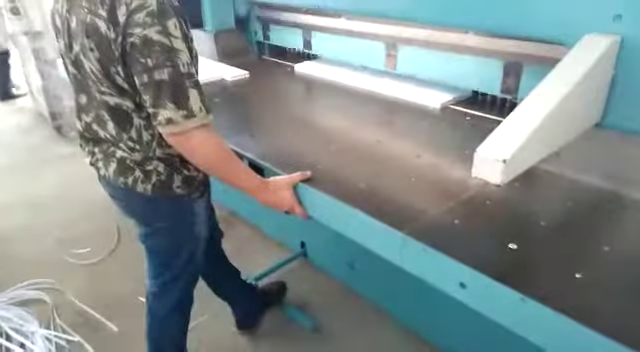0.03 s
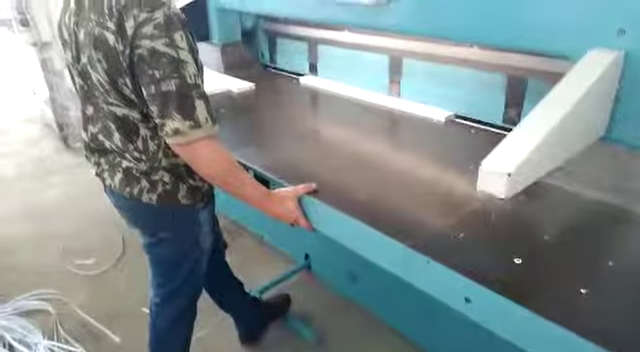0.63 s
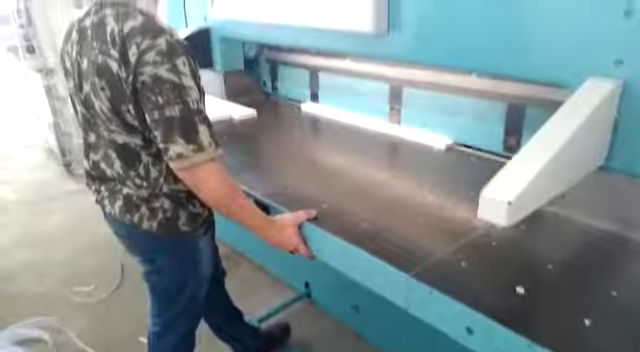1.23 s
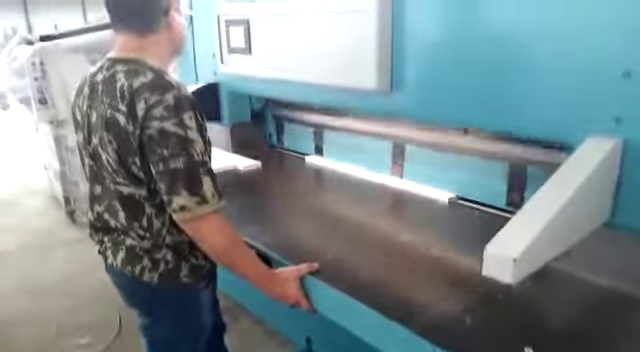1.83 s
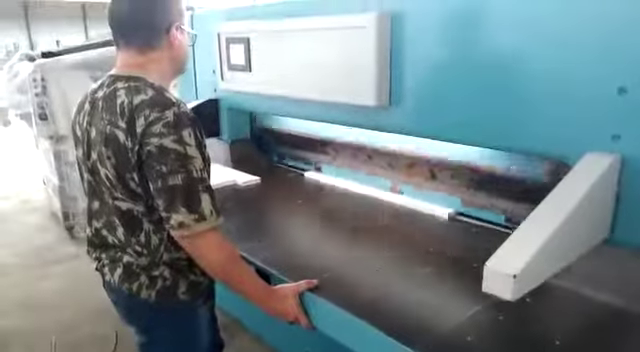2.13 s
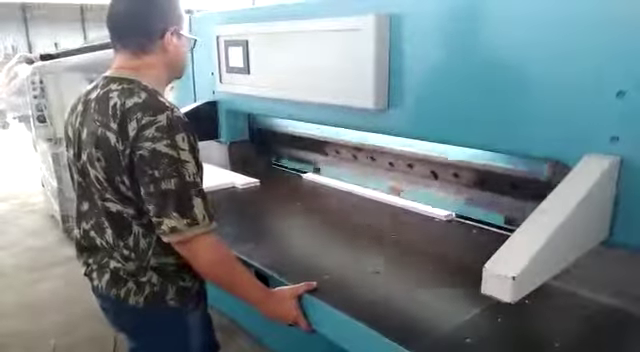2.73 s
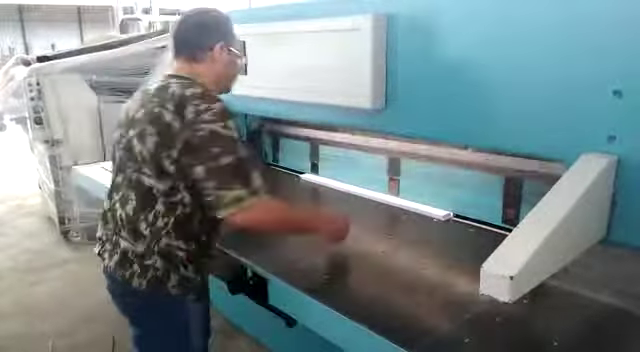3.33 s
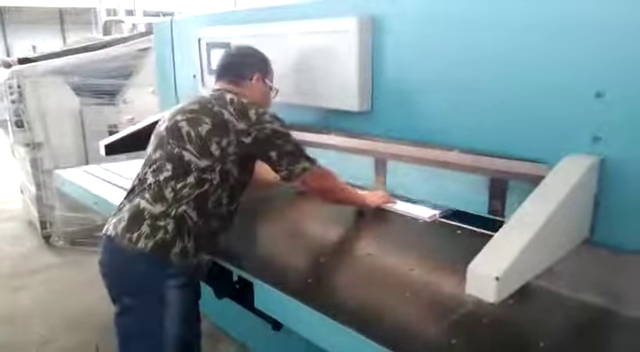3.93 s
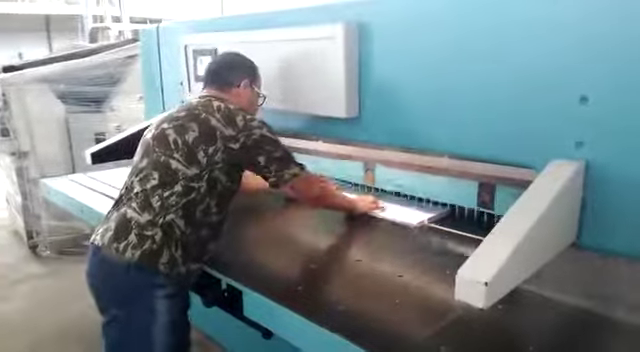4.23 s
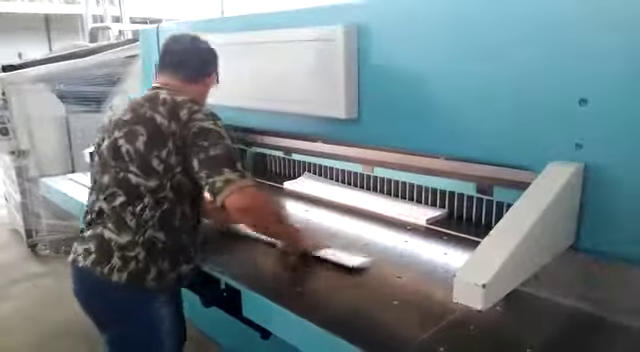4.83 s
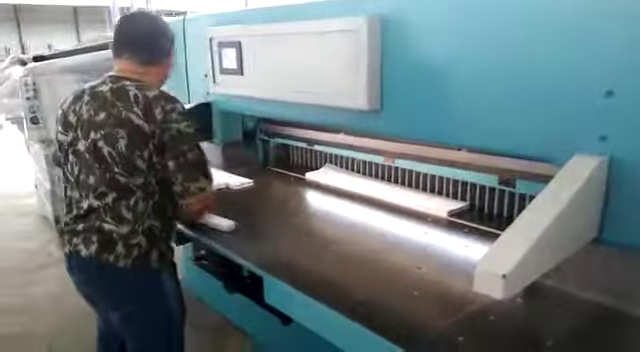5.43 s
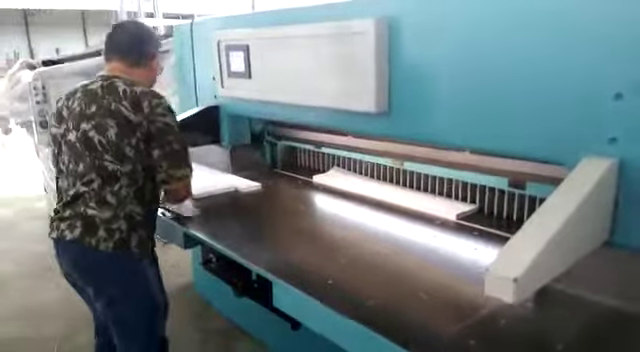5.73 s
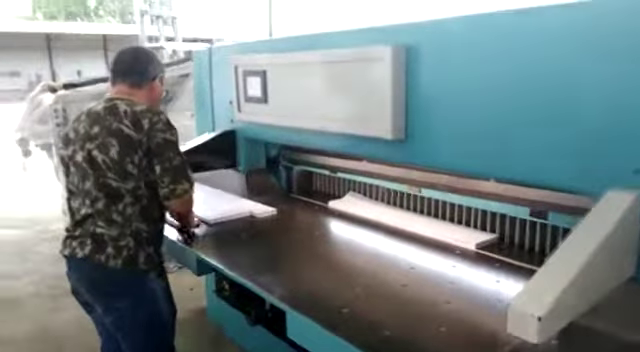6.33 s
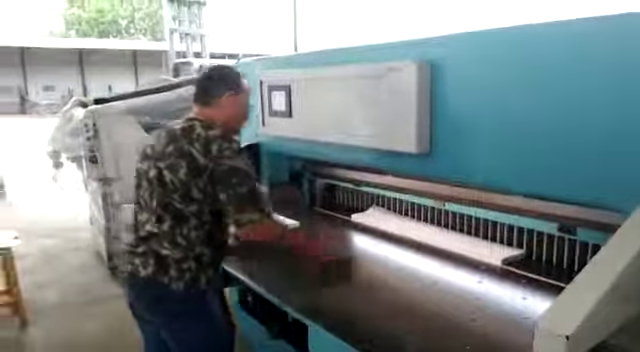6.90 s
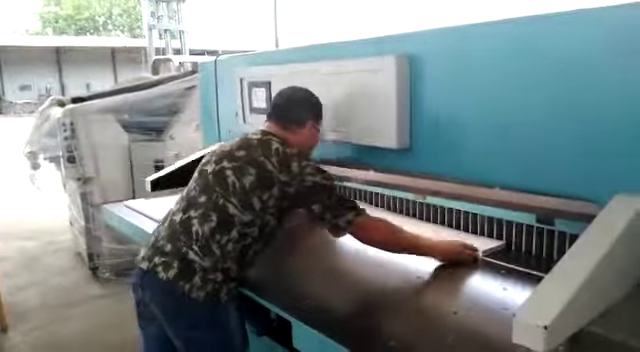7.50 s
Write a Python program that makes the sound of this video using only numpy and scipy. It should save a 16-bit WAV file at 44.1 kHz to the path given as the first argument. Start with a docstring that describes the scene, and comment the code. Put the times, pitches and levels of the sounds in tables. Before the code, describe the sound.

A large hydraulic paper cutter runs in a workshop, its blower droning and air hissing throughout. After a soft swish and light knocks, the clamp slams down at about 0.9 seconds and shudders briefly. From 1 second the pump hums under load, its tones swelling over an uneven gear rumble, with dull thumps near 1.7 seconds. The blade cuts the paper stack around 2.3 to 2.6 seconds with a faint swish and heavy thuds. Ringing steel clacks come at 2.8 seconds, a loud thump at 3.2, a small clink at 3.5 as the pump unloads, and more clacks until 3.8. The blows ring briefly in the room, and each thump ducks the phone microphone's level. After a lull around 4 seconds, the drone, hum and hiss swell back with a fuzzy, wavering whistle, the hiss growing stronger toward the end at about 7.7 seconds.

```python
"""A hydraulic paper guillotine makes one cut: the clamp slams down and shudders, the pump sings under
load while the blade thuds through the stack and returns, and steel parts clack.
Underneath, the blower drones and the air table hisses; the blows ring on in the workshop.
Heard through a phone's two microphone ports: each thump ducks the gain, and the drone swells back."""
import sys
import numpy as np
from scipy import signal
from scipy.fft import rfft, irfft
from scipy.io import wavfile
from scipy.ndimage import uniform_filter1d

SR = 44100
rng = np.random.default_rng(int(sys.argv[2]) if len(sys.argv) > 2 else 0)


def materialize(psi):
    """Save the field psi as 16-bit PCM at rate SR to the path in sys.argv[1].

    A 1-D psi becomes a single channel; in a 2-D psi each row is a channel.
    """
    bounded = np.clip(np.atleast_2d(psi).T, -1, 1)
    quanta = np.round(bounded * 32767).astype(np.int16)
    wavfile.write(sys.argv[1], SR, quanta)


N = 337806
TIME, HZ = np.arange(N) / SR, np.fft.rfftfreq(N, 1 / SR)
FREE_HZ = 145.3  # pulse rate of the pump with no load

# spectra of the heavy frame, the steel parts and hissing air or paper: f/Hz, level/dB
FRAME_COLOUR = [(30, -50), (55, 0), (100, 3), (220, 9.5), (400, 8), (600, 13), (820, 9), (1100, 0),
                (1500, 2), (2200, -9), (5000, -13.5), (14000, -33)]
STEEL_COLOUR = [(30, -42), (100, -12.5), (300, -15.5), (700, -8), (1200, -7.5), (1600, -5), (2000, -0.5),
                (2700, -7.5), (3600, -6.5), (4500, -6), (5800, -14.5), (7000, -18), (9500, -14),
                (14000, -42)]
HISS_COLOUR = [(1500, -47), (2800, -3), (4400, -2), (5800, 2), (7000, 0.5), (9000, 1.5), (11500, -3),
               (14300, -11.5)]
# the drone and hiss swell and sink, and the background dips after the last clack: t/s, blower/dB, air hiss/dB,
# pump hum/dB, whistle/dB
MACHINE_FADERS = [(0, -34.5, -35, -44.5, -41), (1.2, -37, -36.5, -28.5, -51),
                  (3.65, -34.5, -35, -36.5, -39), (4.05, -41, -39.5, -48.5, -40),
                  (4.55, -37.5, -35, -32, -37), (4.9, -36, -33, -27.5, -38), (5.55, -35, -33, -28.5, -30),
                  (6.3, -37.5, -35.5, -29.5, -47), (7.1, -35.5, -28.5, -29, -33.5),
                  (7.66, -39, -28, -33.5, -38)]


def frame_thuds():
    """Clamp and blade land heavy blows that set the frame ringing."""
    # t/s, level/dB, rise/s, t60/s, tilt/(dB per octave), focus/Hz, ring/dB
    hits = [(.62, -20.5, 0.033, 0.26, -14, 70, -20), (.82, -22, 0.022, 0.91, 4.5, 567, -20),
            (.883, -3, .0015, 0.06, -2, 450, -10), (.8905, -3, 0.0013, 0.06, -1.5, 830, -10),
            (.897, -6.5, 0.0014, 0.13, -4, 250, -9), (1.64, -10, .008, .09, -6, 600, -20),
            (1.668, -12, 0.016, 0.15, -7.5, 175, -25), (1.775, -12.5, 0.027, 0.14, -16, 185, -24),
            (2.32, -13, 0.015, 0.62, -2.5, 169, -14), (2.33, -15.5, .012, 0.27, -7, 138, -20),
            (2.385, -13, 0.0077, 0.44, -4, 860, -4), (2.525, -2, 0.012, 0.11, -9.5, 249, -25),
            (2.57, -9.5, 0.0078, 0.14, -16, 138, -26), (3.165, 2, 0.02, 0.13, -3.5, 402, -13.5),
            (3.507, -16, 0.0063, 0.24, 1, 459.8, -8), (3.78, -12.5, 0.019, 0.095, -8.5, 93, -10)]
    # frame resonances: f/Hz, level/dB, t60/s
    modes = [(205, -1, .5), (262, 1, .15), (334, 4, .45), (425, 2, .3), (571, 0, .2), (689, 0, .28),
             (775, 1, .2), (835, 1, .12), (980, -5, .2), (1300, 3, .07), (1502, -5, .11)]
    return blows(hits, FRAME_COLOUR, modes, focus_db=7)


def clamp_shudder(start_hz=54, climb_hz_per_s=100):
    """The clamp judders on the stack, faster as the pressure builds, and each jolt rattles the frame."""
    # the judder's envelope: start/s, end/s, rise/s, fall/s
    start, end, rise, fall = (.905, 1.05, .055, .11)
    # partials of the groan: multiple, level/dB
    partials = [(1, 1), (2, -7.5), (3, -1.5), (4, -10), (5, -4)]
    jolt_hz = start_hz + climb_hz_per_s * np.clip(TIME - start, 0, end - start)
    turns = np.cumsum(jolt_hz * (1 + .025 * wander(10.5))) / SR
    groan = unit_rms(sum(amp(db) * tone(k * turns, rough=.5, flutter_hz=13) for k, db in partials))
    jolts = 1 + .15 * np.cos(2 * np.pi * np.cumsum(jolt_hz) / SR)
    rattle = unit_rms(noise(read(FRAME_COLOUR, HZ)) * jolts)
    return (groan + rattle) * gate(start, end, rise, fall, db=-12.5)


def pump_rate(sag_s=.1507):
    """Pulses per second of the pump: nearly steady, sagging as each load slows the motor."""
    # loads on the motor: start/s, end/s, sag/Hz
    loads = [(1.0, 3.9, 1.1), (1.72, 1.9, 3.3), (2.65, 3.3, 1.2)]
    sag_hz = sum(hz * gate(start, end, sag_s, sag_s) for start, end, hz in loads)
    return FREE_HZ * (1 + .001363 * wander(1.2)) - sag_hz


def pump(rate, pressure_db=-25):
    """The pump hums unsteadily on its third partial and sings with the whole stack under pressure."""
    # partials of the pressure pulses: multiple, level/dB
    partials = [(1, -12), (2, -5.5), (3, -4), (4, 3), (5, -6), (7, -9), (12, -13)]
    # under pressure while the clamp is down, until the blade is back up: start/s, end/s, rise/s, fall/s
    pressure = (1.28, 3.49, .14, .07)
    # one partial swells with each strain (seating the clamp, pressing, biting, cutting, lifting):
    # start/s, end/s, rise/s, fall/s, multiple, level/dB
    strains = [(1.02, 1.112, .04, .07, 5, -20), (1.365, 1.723, 0.062, 0.18, 4, -20),
               (1.744, 1.827, .07, .066, 5, -17.5), (1.9, 2.273, 0.26, .055, 4, -21.5),
               (1.918, 2.33, 0.073, 0.13, 3, -22.5), (1.897, 3.48, 0.04, .07, 2, -26),
               (2.716, 3.485, 0.11, 0.075, 4, -21.5)]
    _, _, hum_db, _ = follow(MACHINE_FADERS)
    turns = np.cumsum(rate * (1 + .004 * wander(14))) / SR
    song = amp(hum_db) * tone(3 * turns, rough=.45, flutter_hz=20)
    for k, partial_db in partials:
        gains = [gate(*pressure, pressure_db + partial_db)]
        gains += [gate(*timing, db) for *timing, multiple, db in strains if multiple == k]
        song += np.linalg.norm(gains, axis=0) * tone(k * turns + 1 / 4, rough=.23, flutter_hz=9)
    return song


def steel_clacks():
    """Steel parts knock together with a hard, bright ring."""
    # t/s, level/dB, rise/s, t60/s, tilt/(dB per octave), focus/Hz, ring/dB
    hits = [(.883, -8.5, .001, 0.075, -12, 1350, -22), (2.318, -13, 0.0084, 0.26, -1, 1650, -30),
            (2.826, -9.5, 0.0073, 0.09, -4.5, 1400, -7), (2.841, -7, 0.0037, 0.16, -6, 1520, -6),
            (3.135, -15, 0.012, 0.17, -7, 1470, -25), (3.595, -8.5, 0.034, 0.23, -5, 1280, -23),
            (3.775, -7.5, 0.0023, 0.079, -2.5, 1730, -15), (3.779, -15.5, 0.0093, 0.38, -3, 3750, -3.5)]
    # steel resonances: f/Hz, level/dB, t60/s
    modes = [(1001, -5, .3), (1217, -1, .25), (1370, -1, .14), (1451, -2, .18), (1534, -1, .3),
             (1701, -1, .3), (1810, -4, .15), (2622, -7, .19), (3241, -5, .25), (3560, -1, .2),
             (3752, 0, .25), (3900, -4, .18), (5550, -9, .2)]
    return blows(hits, STEEL_COLOUR, modes, focus_db=6.5)


def steel_clink():
    """A small steel part clinks as the pump unloads."""
    # t/s, level/dB, rise/s, t60/s, tilt/(dB per octave), focus/Hz, ring/dB
    hits = [(3.504, -13.5, 0.0031, 0.12, 2.3, 5866, -3.5)]
    # the part's resonances: f/Hz, level/dB, t60/s
    modes = [(1507, -9, .22), (3031, -12, .3), (3607, 3.5, .32), (3690, -4, .15), (5383, -7, .08),
             (6907, -6, .07), (8872, -3, .11), (9975, -8, .07)]
    return blows(hits, STEEL_COLOUR, modes, focus_db=4)


def ticks():
    """Short bright spits and ticks, all noise and no ring."""
    # t/s, level/dB, rise/s, t60/s, tilt/(dB per octave), focus/Hz
    hits = [(.68, -25, 0.0038, 0.21, 1.8, 3950), (.708, -23.5, 0.0028, 0.15, 0.17, 9000),
            (1.035, -21.5, 0.0068, 0.3, 0.086, 7900), (1.095, -22.5, 0.013, 0.29, 0, 7800),
            (2.772, -19.5, 0.0022, 0.14, 1.3, 9040), (2.934, -19, 0.0033, 0.099, 2.3, 9370),
            (3.135, -21.5, 0.0038, 0.2, 0.89, 6300), (3.779, -28, .002, 0.1, 2.04, 10300)]
    # their spectrum: f/Hz, level/dB
    colour = [(1000, -24), (3500, -4), (8500, -3.5), (13500, -8), (15000, -33)]
    return blows(hits, colour, [], focus_db=3.5)


def drive_rumble():
    """Gears and slides rumble unevenly while clamp and blade travel."""
    # the clamp's long travel and the blade's stroke within it: start/s, end/s, rise/s, fall/s, level/dB
    travels = [(1.0, 3.31, 0.073, 0.91, -22.5), (1.851, 3.24, 0.15, 0.28, -22.5)]
    # the rumble's spectrum: f/Hz, level/dB
    colour = [(40, -31), (90, 0), (160, -2), (250, 6.5), (450, 9), (750, 2), (1300, -6.5), (2500, -45),
              (6000, -59)]
    rumble = noise(read(colour, HZ)) * amp(.83 * wander(32))
    return rumble * np.linalg.norm([gate(*row) for row in travels], axis=0)


def paper_swishes():
    """Swishes as the clamp starts down, the blade slices the stack and a hand sweeps over the table."""
    # start/s, end/s, rise/s, fall/s, level/dB
    swishes = [(0.455, 0.63, 0.13, 0.13, -33), (2.203, 2.496, 0.088, 0.058, -32.5),
               (3.15, 3.685, 0.13, 0.073, -34)]
    return noise(read(HISS_COLOUR, HZ)) * sum(gate(*row) for row in swishes)


def duct_colour(ripple_db=2.5):
    """EQ in dB on the moving air: peaks of the blower and its ducts, rippled by the hall's standing waves."""
    # housing resonances: f/Hz, width/Hz, boost/dB
    peaks = [(402, 103, 7.5), (1608, 140, 6), (1745, 100, 6.5), (2576, 76, 9), (3030, 440, 3),
             (4010, 620, 4.5)]
    peaks_db = sum(db / (1 + (2 * (HZ - hz) / width) ** 2) for hz, width, db in peaks)
    ripple = unit_rms(uniform_filter1d(rng.standard_normal(len(HZ)), size=150))
    return peaks_db + ripple_db * ripple


def blower(rate, duct_db, roar_db=12):
    """The blower roars in its housing, with wavering tones that follow the motor's speed."""
    # the roar's spectrum: f/Hz, level/dB
    colour = [(30, -25), (60, -11.5), (95, -13), (140, -5.5), (200, -7.5), (270, 0.5), (450, -4.5),
              (560, 0), (750, -4), (1100, -6.5), (1400, -10), (2000, -5), (3300, -19), (6000, -29.5)]
    # motor and blower tones, then the blower's steadiest whines: f/Hz, level/dB on the blower fader
    hums = [(290, -10.5), (324, -9.5), (360.5, -2.5), (603, -4), (646, -6), (758, -16.5), (866, -9.5),
            (974, -10.5), (1108, -9.5)]
    whines = [(541, -1), (1733, .5)]
    fader_db, *_ = follow(MACHINE_FADERS)
    roar = noise(read(colour, HZ) + duct_db) * amp(roar_db + .5 * wander(23))
    motor_time = np.cumsum(rate / FREE_HZ) / SR  # runs slow under load
    tones = sum(amp(db) * tone(hz * motor_time, rough=.36, flutter_hz=3) for hz, db in hums)
    tones += sum(amp(db) * tone(hz * motor_time, rough=.33, flutter_hz=7) for hz, db in whines)
    return amp(fader_db) * (roar + tones)


def air_table(duct_db, whistle_hz=1637, hiss_trim_db=3):
    """Air hisses from the table's valves; beside it a fuzzy whistle swells and fades."""
    _, hiss_db, _, whistle_db = follow(MACHINE_FADERS)
    whistle = amp(whistle_db) * tone(whistle_hz * TIME, rough=1, flutter_hz=20)
    hiss = noise(read(HISS_COLOUR, HZ) + duct_db) * amp(hiss_db + hiss_trim_db + .5 * wander(27))
    return hiss + whistle


def workshop_reverb(x, predelay_s=.012, wet_db=-11):
    """The hall's tail: dense reflections, each band dying at its own speed."""
    # decay of the hall: f/Hz, t60/s
    decay = [(100, 0.94), (500, 0.65), (2000, 0.37), (5000, 0.15), (12000, 0.026)]
    reflections = rng.standard_normal((2, SR)) * (TIME[:SR] > predelay_s)
    hz, t, bands = signal.stft(reflections, SR, nperseg=256)
    _, tail = signal.istft(bands * amp(-60 * t / read(decay, hz)[:, None]), SR, nperseg=256)
    return amp(wet_db) * signal.fftconvolve(x, tail / np.linalg.norm(tail[0]), axes=1)[:, :N]


def blows(hits, colour, modes, focus_db, chatter_db=3):
    """Each blow is a short chatter of contacts through a dense body, plus any modes that ring on."""
    out, t, hz = np.zeros((2, N)), TIME[:SR], np.fft.rfftfreq(SR, 1 / SR)
    for start, db, rise, t60, tilt_db, focus_hz, *ring_db in hits:
        strike = (tilt_db, focus_hz, focus_db)
        attack = np.minimum(t / rise, 1)
        envelope = attack * amp(-60 * t / t60)
        contacts = rng.standard_normal((2, SR))
        contacts += .84 * rng.standard_normal(SR)  # direct sound, common to both ports
        contacts *= amp(chatter_db * np.repeat(rng.standard_normal(SR // 45), 45))  # 1 ms grains
        sound = irfft(rfft(contacts) * amp(read(colour, hz) + strike_colour(hz, *strike))) * envelope
        sound *= np.sqrt(2) * np.linalg.norm(envelope) / np.linalg.norm(sound)
        weights = [amp(mode_db + strike_colour(f, *strike)) for f, mode_db, _ in modes]
        for weight, (f, _, mode_t60) in zip(weights, modes):
            mode = ringing_mode(f, mode_t60)
            gain = amp(ring_db[0]) * weight / np.linalg.norm(weights)
            add(sound, 0, gain * attack[:mode.shape[1]] * mode)
        add(out, start, amp(db) * sound)
    return out


def strike_colour(hz, tilt_db, focus_hz, focus_db):
    """EQ in dB of one blow: the place it lands favours one region of the spectrum."""
    # low-pitched thuds reach the deep bass; higher-pitched blows are thinner
    bass_edge_hz = min(focus_hz / 2.3, 165)
    low_cut = -10 * np.log10(1 + (bass_edge_hz / (hz + 1)) ** 8)
    tilt = tilt_db * np.log2(np.hypot(hz, 140) / focus_hz)
    octaves = np.log2(np.maximum(hz, 50) / focus_hz)
    return low_cut + tilt + focus_db * np.exp(-(octaves / .23) ** 2)


def ringing_mode(hz, t60, split_hz=14):
    """Bolted parts ring in clusters: a main partial and two weaker neighbours that beat against it."""
    t = TIME[:round(t60 * SR)]
    detune, phase = rng.standard_normal((3, 1)), rng.random((3, 1))
    partial_hz = hz + split_hz * (detune / 3 + [[0], [-1], [1]])
    ring = np.array([1.2, .55, .55]) @ np.exp(2j * np.pi * (partial_hz * t + phase))
    return np.array([ring.imag, ring.real]) * amp(-60 * t / t60)  # a quarter cycle apart at the ports


def tone(turns, rough, flutter_hz):
    """One partial of rms 1; many paths through the room make it flutter differently at each port."""
    paths = [1j ** port + rough * (wander(flutter_hz) + 1j * wander(flutter_hz)) for port in range(2)]
    return unit_rms((np.array(paths) * np.exp(2j * np.pi * turns)).real)


def noise(spectrum_db):
    """Diffuse coloured noise of rms 1 at the two ports."""
    return unit_rms(irfft(rfft(rng.standard_normal((2, N))) * amp(spectrum_db), N))


def wander(rate_hz, control_hz=500):
    """Random drift of rms 1, rolling off above the given rate."""
    hz = np.fft.rfftfreq(4096, 1 / control_hz)
    drift = irfft(rfft(rng.standard_normal(4096)) / (1 + (hz / rate_hz) ** 2))
    return unit_rms(np.interp(TIME * control_hz, np.arange(len(drift)), drift))


def gate(start, end, rise, fall, db=0):
    """Envelope that ramps up, holds its level and ramps down after its end."""
    return amp(db) * np.clip(np.minimum((TIME - start) / rise, 1 - (TIME - end) / fall), 0, 1)


def amp(db):
    """Decibels to gain."""
    return 10 ** (np.asarray(db) / 20)


def unit_rms(x):
    """Scales to rms 1."""
    return x / np.sqrt(np.mean(x ** 2) + 1e-20)


def read(points, hz):
    """Reads a table on a log-frequency axis."""
    f, value = np.transpose(points)
    return np.interp(np.log(hz + 1), np.log(f + 1), value)


def follow(rows):
    """Fader curves, sample by sample."""
    times, *columns = np.transpose(rows)
    return [np.interp(TIME, times, column) for column in columns]


def add(mix, start_s, sound):
    """Mixes a sound in at its start time."""
    part = mix[:, round(start_s * SR):][:, :sound.shape[1]]
    part += sound[:, :part.shape[1]]


def gain_control(x, sense_hz=101.3, threshold_db=-39, squeeze=.66, duck_s=.026, recover_db_per_s=9.5):
    """The bass of each thump pushes the phone's gain down; it creeps back at a steady rate."""
    bass = signal.sosfilt(signal.butter(2, sense_hz, fs=SR, output="sos"), x)
    bass_db = 10 * np.log10(abs(uniform_filter1d((bass ** 2).mean(0), size=2600)) + 1e-12)
    duck_db = squeeze * np.maximum(bass_db - threshold_db, 0)
    recovery = recover_db_per_s * TIME
    held_db = np.maximum.accumulate(duck_db + recovery) - recovery
    pole = np.exp(-1 / (duck_s * SR))
    return x * amp(-signal.lfilter([1 - pole], [1, -pole], held_db))


def microphone_pair(left, right, port_hz=2290):
    """Port spectra to stereo: each channel is one port minus the delayed other, evened out in level."""
    # bleed subtracted from the far port: f/Hz, share
    cross_feed = [(4600, .97), (5800, .35), (7000, .18), (12000, .06)]
    # phase of left ahead of right: f/Hz, lead/rad
    left_lead = [(60, 1.4), (280, 1.45), (420, 1.8), (560, 0)]
    # balance, left minus right: f/Hz, level/dB
    balance = [(60, -3), (400, 0), (1150, 0), (1650, 3), (2290, 0), (3400, 0), (4080, -1.5), (4580, 0),
               (5800, -1), (8000, -4)]
    alike = .999 * np.sinc(2 * HZ / port_hz)  # long waves reach both ports alike
    far = read(cross_feed, HZ) * np.exp(-2j * np.pi * HZ / port_hz)
    # the subtraction combs sum and difference in turn
    mid_gain = np.sqrt(1 + alike) * abs(1 - far)
    side_gain = np.sqrt(1 - alike) * abs(1 + far)
    total = np.sqrt(2) * np.hypot(mid_gain, side_gain)
    mid = (left + right) * mid_gain / total
    side = (left - right) * side_gain / total
    lean = amp(read(balance, HZ) / 2) * np.exp(.5j * read(left_lead, HZ))
    return irfft(np.array([(mid + side) * lean, (mid - side) / lean]), N)


def scene():
    """One cutting stroke over the running machine; only blows and shudder feed the reverb."""
    rate = pump_rate()
    impacts = clamp_shudder() + frame_thuds() + steel_clacks() + ticks() + steel_clink()
    duct_db = duct_colour()
    bed = blower(rate, duct_db) + air_table(duct_db)
    return impacts + pump(rate) + drive_rumble() + paper_swishes() + bed + workshop_reverb(impacts)


def record(dry, low_cut_hz=46, ceiling=.85, high_cut_hz=14380):
    """The phone: gain control, low cut, microphone pair, soft overload and band limit."""
    low_cut = (HZ / low_cut_hz) ** 4 / np.sqrt(1 + (HZ / low_cut_hz) ** 8)
    left, right = rfft(gain_control(dry)) * low_cut
    stereo = microphone_pair(left, right)
    saturated = stereo / (1 + (stereo / ceiling) ** 6) ** (1 / 6)
    high_cut = signal.firwin(511, high_cut_hz, window=("kaiser", 9), fs=SR)
    return signal.oaconvolve(saturated, high_cut[None], "same")


dry = scene()
out = record(dry)
materialize(out)
```